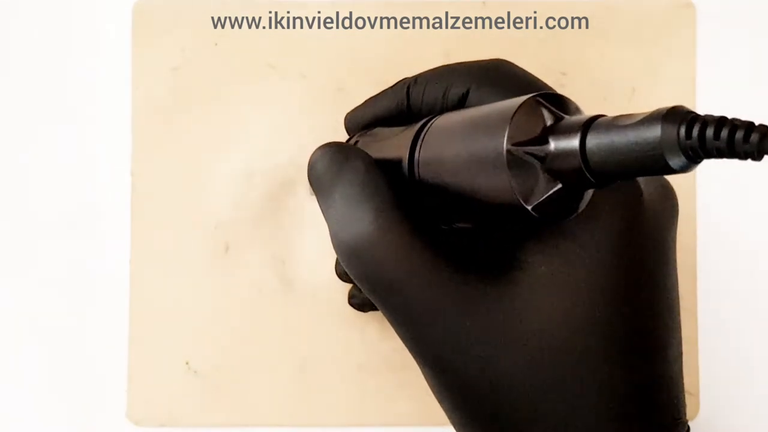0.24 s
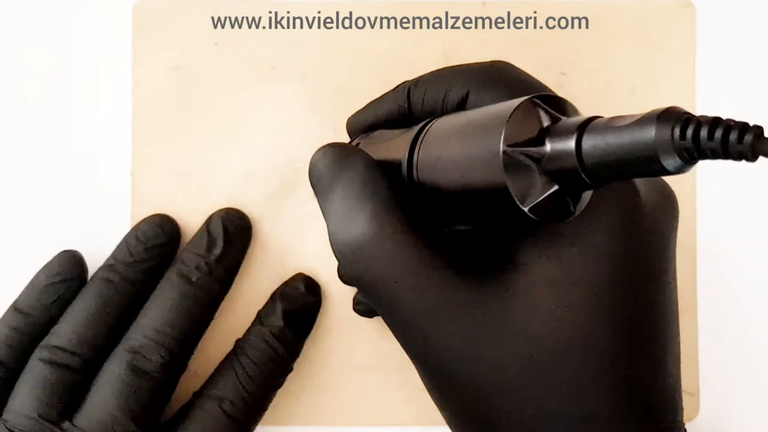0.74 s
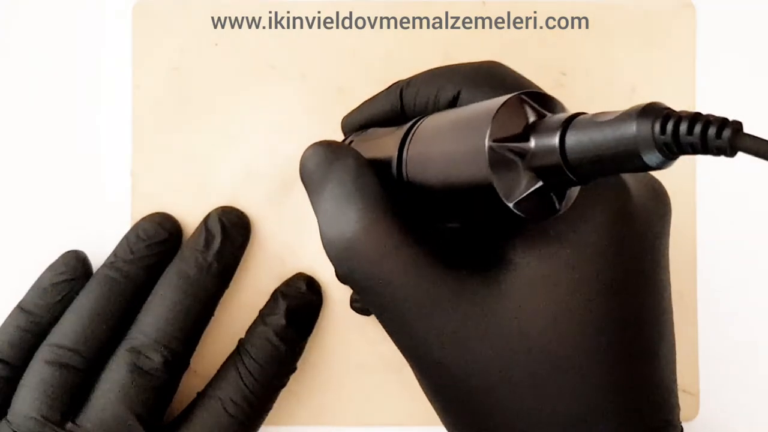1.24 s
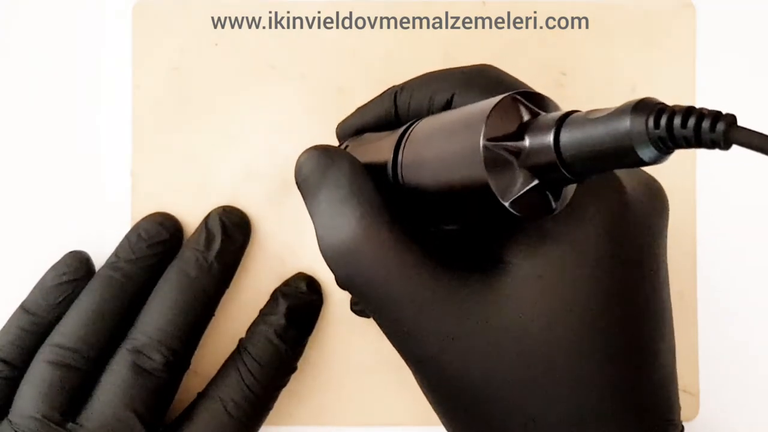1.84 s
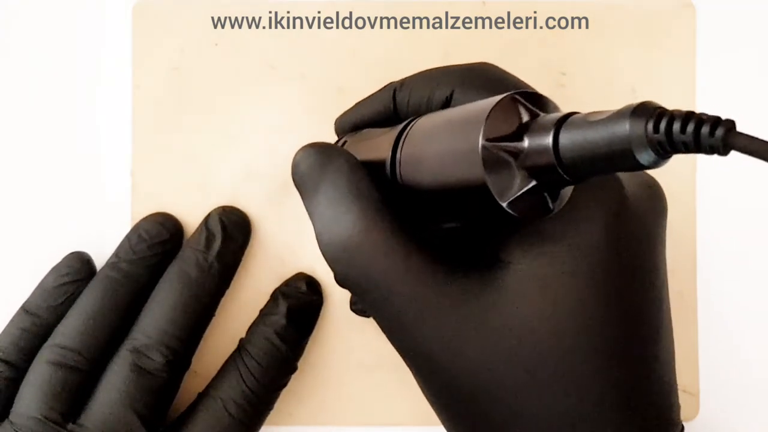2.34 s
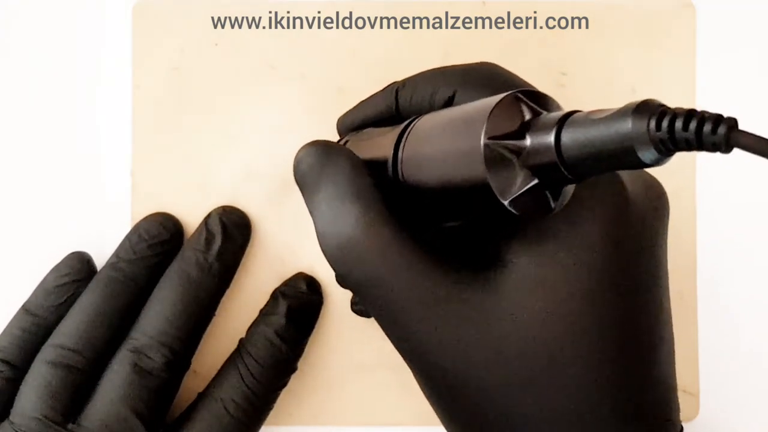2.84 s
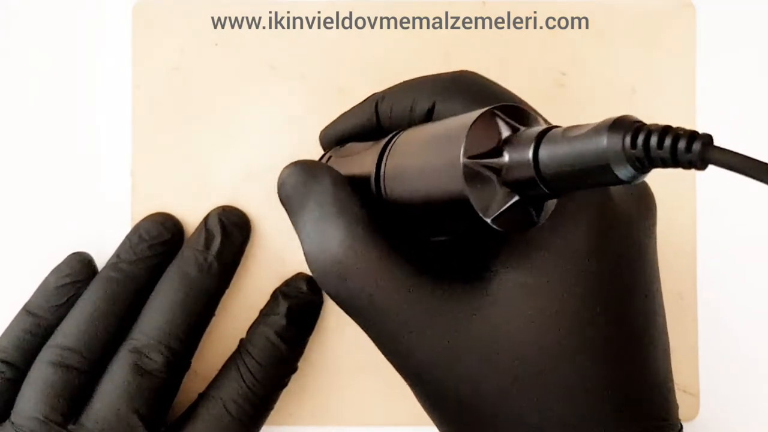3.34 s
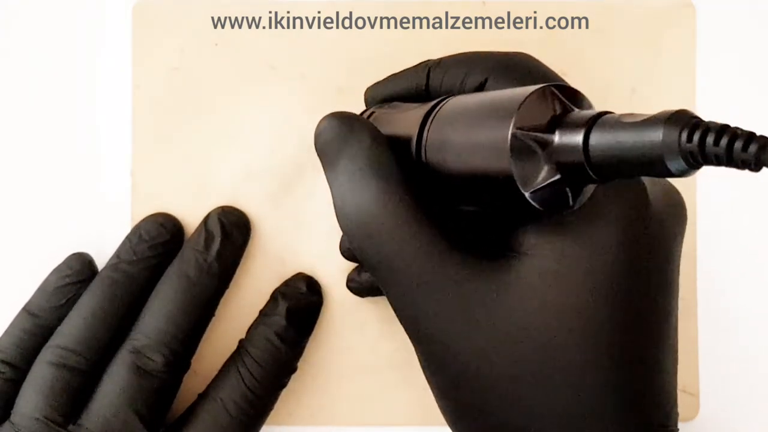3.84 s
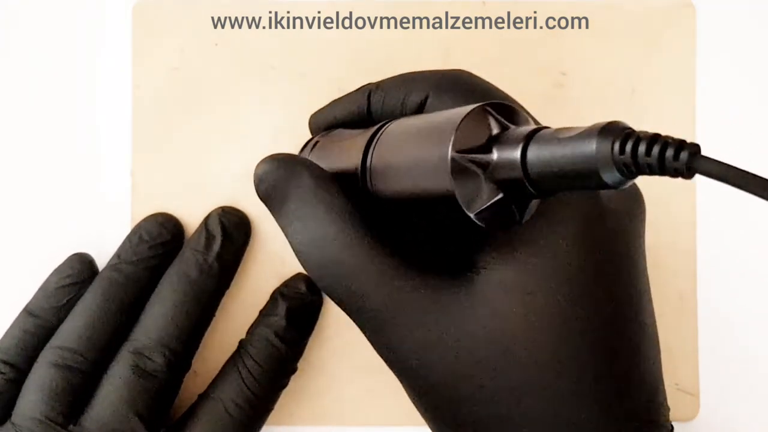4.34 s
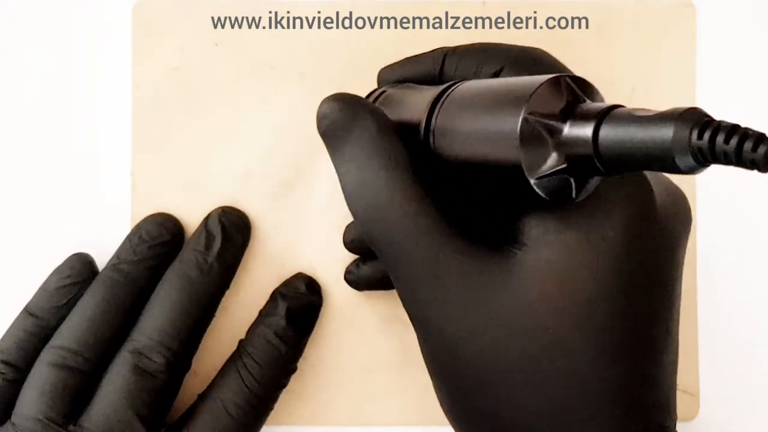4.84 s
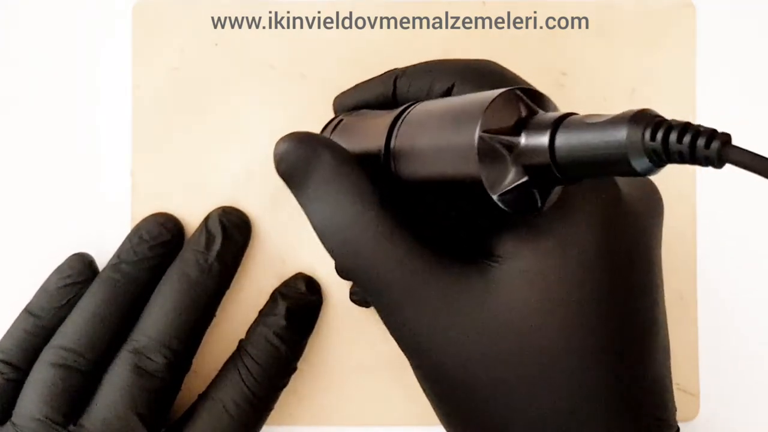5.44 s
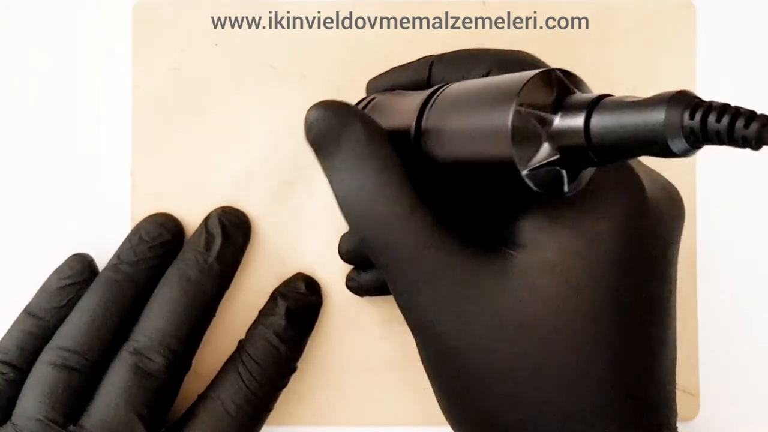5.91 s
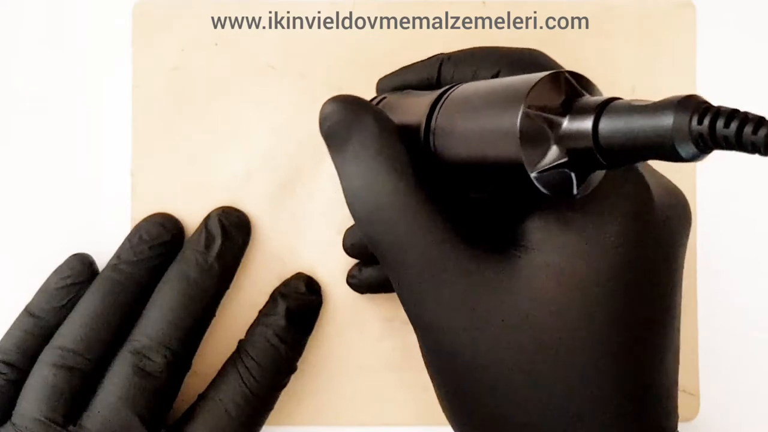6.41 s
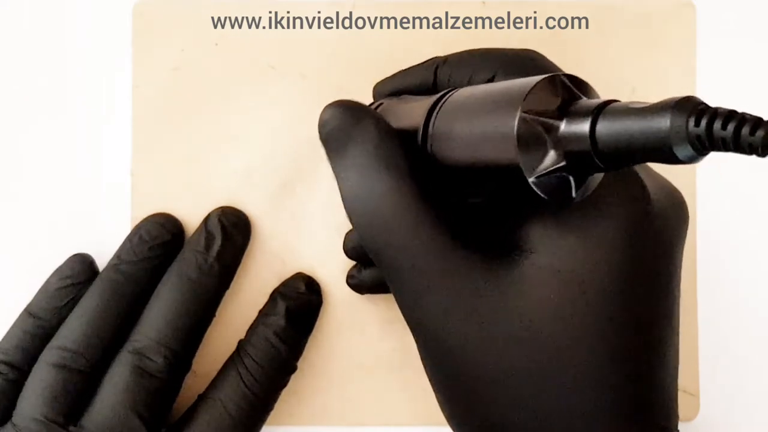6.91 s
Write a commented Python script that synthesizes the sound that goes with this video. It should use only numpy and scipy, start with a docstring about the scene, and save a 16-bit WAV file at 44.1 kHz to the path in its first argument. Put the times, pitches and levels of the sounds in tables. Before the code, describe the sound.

Close stereo pickup of a handheld tattoo machine working on rubber practice skin. A rough, noisy onset settles into a continuous low drumming drone, overlaid by a mid-range buzz, metallic chatter and thin treble rasp. Pitch sags and recovers slightly as the hand presses, with a few tiny dull snags buried inside. It cuts off quickly near the end, leaving quiet hiss and rumble in a dry small room.

```python
"""Hiss and rumble, a faint grazing buzz, then the steady drumming buzz of a rotary tattoo pen.
It draws on a rubber practice skin that lies on a table in a small room.
Once per motor turn the cam knocks, the needle thumps the skin (summed partials) and rasps back (noise bursts).
Hand pressure slows the motor and sets the level of every part.
The needle lands, works back and forth and lifts off, leaving hiss and rumble."""
import sys
import numpy as np
from scipy import signal
from scipy.fft import rfft, irfft, next_fast_len
from scipy.io import wavfile
from scipy.ndimage import uniform_filter1d

SR = 44100
rng = np.random.default_rng(int(sys.argv[2]) if len(sys.argv) > 2 else 0)


def unload_audio(sound):
    """Save the sound as a 16-bit wav file, at the path given as the first command line argument."""
    columns = np.transpose(np.atleast_2d(sound))
    # keep every value between -1 and 1, then stretch to whole-number steps
    steps = np.round(np.clip(columns, -1, 1) * 32767)
    wavfile.write(sys.argv[1], SR, steps.astype(np.int16))


N = 316194


def from_db(db):
    """Decibels to gain."""
    return 10 ** (np.asarray(db) / 20)


def rms_one(x):
    """Scale to rms 1."""
    return x / np.sqrt(np.mean(x ** 2) + 1e-20)


def evened(x, size=2600):
    """Hold the running rms at 1, so that partials trade strength at a constant level."""
    return x / np.sqrt(uniform_filter1d(np.mean(x ** 2, 0), size=size) + 1e-12)


def in_time(rows):
    """Each column of a curve, sample by sample."""
    s, *columns = np.transpose(rows)
    return [np.interp(np.arange(N) / SR, s, c) for c in columns]


def at_hz(points, hz):
    """Read a spectrum on a log-frequency axis."""
    point_hz, value = np.transpose(points)
    return np.interp(np.log(hz), np.log(point_hz), value)


def drift(rate_hz):
    """Slow random wander of spread 1: two-pole lowpassed noise, computed at SR / 40."""
    step = 40
    r = np.exp(-2 * np.pi * rate_hz * step / SR)
    noise = rng.standard_normal(N // step + 2002)
    slow = rms_one(signal.lfilter([1], [1, -2 * r, r * r], noise)[2000:])
    return np.interp(np.arange(N) / step, np.arange(len(slow)), slow)


def pan(lean_db):
    """Left and right gains for a level difference."""
    return from_db(np.array([[.5], [-.5]]) * lean_db)


def mid_side(mid, side, alike):
    """Two channels with correlation `alike` from two independent signals."""
    return rms_one(np.sqrt(1 + alike) * mid + np.sqrt(1 - alike) * side * [[1], [-1]])


def stereo_noise(alike):
    """White noise in two correlated channels."""
    mid, side = rng.standard_normal((2, N))
    return mid_side(mid, side, alike)


# pen's stereo position, left minus right: f/Hz, level/dB
PEN_LEAN = [(105, 3.4), (210, 3.6), (315, 1.5), (420, 2.1), (630, -1.5), (735, 6), (840, -3), (1300, 1.5),
            (2400, 1.8), (4400, 4), (6000, 5.2), (7600, 0), (10500, .6), (15000, -1)]


def colour(x, spectrum, lean=0):
    """Minimum-phase filter with steep skirts, output rms 1; `lean` is the share of the pen's stereo position."""
    size = next_fast_len(N + SR // 10) * 2
    hz = np.maximum(np.fft.rfftfreq(size, 1 / SR), 1)
    octaves_outside = np.abs(np.log2(hz / np.clip(hz, spectrum[0][0], spectrum[-1][0])))
    level_db = np.maximum(at_hz(spectrum, hz) - 60 * octaves_outside, -80)
    cepstrum = irfft(np.log(from_db(level_db)))
    response = np.exp(rfft(2 * cepstrum[:size // 2], size) - cepstrum[0])
    placed = rfft(x, size) * response * pan(lean * at_hz(PEN_LEAN, hz))
    return rms_one(irfft(placed)[:, :N])


def resonate(x, hz, width_hz):
    """Two-pole resonance, gain 1 on top."""
    r = np.exp(-np.pi * width_hz / SR)
    zeros = np.array([1, 0, -1]) * (1 - r * r) / 2
    poles = [1, -2 * r * np.cos(2 * np.pi * hz / SR), r * r]
    return signal.lfilter(zeros, poles, x)


def contacts(turns, when, jitter_s, uneven_db):
    """One click per turn, `when` turns in, with random spread in time and strength."""
    count = np.arange(1, int(turns[-1]) - 1)
    chance = np.sqrt(3) * rng.uniform(-1, 1, (1000, 2))[:len(count)]   # spread 1
    at = np.interp(count + when, turns, np.arange(N)) + chance[:, 0] * jitter_s * SR
    at = np.clip(at, 0, N - 2)
    whole, fraction = at.astype(int), at % 1
    clicks, size = np.zeros(N), from_db(uneven_db * chance[:, 1])
    clicks[whole] = size * (1 - fraction)
    clicks[whole + 1] += size * fraction
    return clicks


def die_away(clicks, decay_s):
    """Each click starts an exponential envelope."""
    return signal.lfilter([1], [1, -np.exp(-1 / (decay_s * SR))], clicks)


def repeating(turns, memory, alike):
    """Friction over the same roughness: noise locked to the turn, keeping share `memory` each turn."""
    size, oversample = 420, 4   # noise points per turn
    fresh = rng.standard_normal((2, 900, size))
    worn = signal.lfilter([1], [1, -memory], fresh, axis=1)[:, 100:].reshape(2, -1)
    fine = signal.resample_poly(worn, oversample, 1, axis=1)
    mid, side = [np.interp(turns * size * oversample, np.arange(len(w)), w) for w in fine]
    return mid_side(mid, side, alike)


def scratches(turns, when, decay_s, uneven_db, steady, memory, alike):
    """Once per turn a dying burst of friction, over steady rubbing."""
    clicks = contacts(turns, when=when, jitter_s=.00008, uneven_db=uneven_db)
    return rms_one((die_away(clicks, decay_s) + steady) * repeating(turns, memory, alike))


def hand_echo(x, delay_s, share=.33):
    """Close reflection off the hand; its delay drifts as the hand moves, shifting the colour."""
    now = np.arange(N)
    then = now - delay_s * SR * np.exp(0.14 * drift(0.9))
    echo = np.array([np.interp(then, now, side) for side in x])
    return rms_one(x + share * echo)


# motor speed, sagging under the hand: t/s, f/Hz
MOTOR_SPEED = [(0.22, 110.7), (0.34, 107.4), (0.38, 104.6), (0.74, 105.5), (0.79, 106.9), (0.98, 104.9),
               (1.06, 108.2), (1.24, 106.7), (1.35, 110.3), (1.55, 105.9), (1.64, 110.3), (1.7, 109.7),
               (1.75, 106.0), (1.87, 105.7), (1.96, 110.5), (2.02, 106.0), (2.22, 108.8), (2.26, 111.2),
               (2.31, 106.8), (2.4, 104.6), (2.47, 106.8), (2.56, 104.3), (3.05, 103.4), (3.22, 106.2),
               (3.33, 106.4), (3.47, 103.6), (3.68, 104.4), (3.78, 107.1), (4.02, 102.2), (4.28, 104.1),
               (4.37, 106.7), (4.5, 103.6), (4.72, 104.3), (4.81, 107.1), (4.93, 107.4), (5.05, 104.7),
               (5.27, 108.4), (5.42, 104.1), (5.73, 106.4), (5.87, 103.3), (5.97, 104.5), (6.03, 106.8),
               (6.22, 103.4), (6.42, 106.2)]


def motor():
    """Motor speed in Hz, and its angle in turns with a slight fast flutter."""
    speed_hz, = in_time(MOTOR_SPEED)
    return speed_hz, np.cumsum(speed_hz * (1 + 0.001 * drift(28))) / SR


# pressure laws: pressure/0-1, then relative level/dB of thump, knock, cam buzz, rattle, rasp; noisy share of buzz/0-1
PRESSURE_LAWS = [(0, -38.5, -51, -8, -49, -58, 0.45), (.3, -32, -47, -1, -45.6, -51.5, 0.15),
                 (.65, -27, -43.5, .5, -43.5, -48, 0.15), (1, -24.3, -37, -1, -42, -45, 0.27)]


def pressure_laws(speed_hz):
    """The motor's sag tells the pressure; each part's setting follows from it."""
    light_hz, sag_hz = 111.3, 9   # speed at the lightest touch, fall at full pressure
    steps, *columns = np.transpose(PRESSURE_LAWS)
    return [np.interp((light_hz - speed_hz) / sag_hz, steps, c) for c in columns]


def partial_lean(order):
    """Stereo gains of a partial at the mean motor speed."""
    return pan(at_hz(PEN_LEAN, order * np.mean(np.array(MOTOR_SPEED)[:, 1])))


# drumming partials: multiple of motor speed, relative level/dB
DRUM_PARTIALS = [(1, 2), (2, 1.66), (3, 5.1), (4, -7), (5, -21.5), (6, -17), (7, -19), (8, -19.5), (9, -40)]


def thump(turns, thump_db, waver_db=0.92):
    """The needle's push gives four strong partials; the third and fourth waver most."""
    left_lead_turns, bass_lag_turns = .014, .11
    turns = turns + np.array([[left_lead_turns], [0]])
    out = np.zeros((2, N))
    for order, (_, level_db) in enumerate(DRUM_PARTIALS[:4], 1):
        gain = from_db(level_db + (order - 1.5) * waver_db * drift(7.0))
        late = bass_lag_turns * (order == 1)   # heavy table top follows the lowest partial late
        out -= partial_lean(order) * gain * np.cos(2 * np.pi * order * (turns - late))
    return from_db(thump_db + 0.13) * evened(out)


def knock(turns, knock_db, lead_turns=0.1624, waver_db=2.5, path_shift_rad=1.0):
    """The table's knock, just ahead of the thump: the next five partials, phases shifting with the hand."""
    out = np.zeros((2, N))
    for order, (_, level_db) in enumerate(DRUM_PARTIALS[4:], 5):
        path = path_shift_rad * drift(2) + np.array([.4 + .5 * drift(2), -.4 + .5 * drift(2)])
        gain = from_db(level_db + waver_db * drift(9.1))
        out += partial_lean(order) * gain * np.cos(2 * np.pi * order * (turns + lead_turns) + path)
    return from_db(knock_db - 1.25) * evened(out)


def skin_rub(turns, thump_db):
    """Dull scuffing of the needle in the rubber, growing with the pressure."""
    scuff = scratches(turns, when=-.2, decay_s=.003, uneven_db=3., steady=.4, memory=.15, alike=.8)
    dull = [(60, -18), (270, 4.5), (400, -2), (560, -12.0), (1000, -12.5), (1800, -19)]   # f/Hz, dB
    return from_db(thump_db - 20.5) * colour(scuff, dull, lean=1)


# needle snags: t/s, relative level/dB
NEEDLE_SNAGS = [(0.9114, -37), (1.8234, -43), (2.6457, -36), (2.6552, -34.5)]


def snags(decay_s=0.0025):
    """Brief dull cracks where the needle catches in the rubber: decaying band-passed noise."""
    clicks = np.zeros(N)
    for s, db in NEEDLE_SNAGS:
        clicks[round(s * SR)] = from_db(db)
    crack = die_away(clicks + 1e-18, decay_s) * stereo_noise(.4)
    band = signal.butter(2, [700, 3700], "band", fs=SR, output="sos")
    return from_db(14.0) * signal.sosfilt(band, crack)


# housing response: f/Hz, level/dB
HOUSING_RESPONSE = [(950, -1.5), (1040, 2), (1150, -5.5), (1260, 1), (1370, 0), (1580, 2), (1700, -10),
                    (1800, -27)]
# housing ring, shifting with the grip: t/s, f/Hz
GRIP_RING = [(0.2, 1350), (0.28, 1475), (1.74, 1434), (1.77, 1340), (2.28, 1450), (2.35, 1310),
             (2.66, 1440), (2.87, 1280), (3.37, 1460), (3.82, 1350), (3.91, 1395), (4.03, 1290),
             (4.6, 1490), (4.81, 1310), (4.86, 1480), (5.55, 1494), (5.62, 1400), (6.42, 1440)]
# housing whine: t/s, relative level/dB
WHINE_LEVEL = [(0.24, -37), (0.3, -35), (0.53, -46.5), (0.6, -38), (0.74, -44.5), (2.171, -42.5),
               (2.99, -48.5), (3.08, -41.5), (3.34, -43.5), (3.4, -40), (4.24, -44), (4.34, -46.5),
               (4.67, -40.5), (4.79, -44), (5.06, -39), (5.12, -47), (5.45, -40.7), (5.73, -43.5),
               (5.83, -37), (6.0, -43), (6.31, -41), (6.38, -45.6)]


def cam(turns, speed_hz, buzz_db, noisy, lead_turns=0.3255, grip_width_hz=110, grip_db=9, waver_db=1.5,
        path_shift_rad=0.44):
    """The cam's blow drives the housing, which favours partials near its shifting ring."""
    (grip_hz,), (whine_db,) = in_time(GRIP_RING), in_time(WHINE_LEVEL)
    lines, power = np.zeros((2, N)), 0
    for order in range(9, 18):
        hz = order * speed_hz
        favour_db = grip_db / (1 + ((hz - grip_hz) / grip_width_hz) ** 2)
        gain = from_db(at_hz(HOUSING_RESPONSE, hz) + favour_db + waver_db * drift(6.1))
        path = path_shift_rad * drift(1) + .35 * np.array([drift(1.5), drift(1.5)])
        lines += gain * np.cos(2 * np.pi * order * (turns + lead_turns) + path)
        power = power + gain ** 2 / 2
    lines /= np.sqrt(uniform_filter1d(power, size=2200))
    skips = scratches(turns, when=-.45, decay_s=0.0015, uneven_db=-1.0, steady=0.34, memory=0.29, alike=1.0)
    skips = colour(skips, [(950, -11.0), (1200, -15), (1350, 1.0), (1560, -2), (1730, -14), (2300, -8),
                           (2900, -29)])
    buzz = np.sqrt(1 - noisy ** 2) * lines + noisy * skips
    return from_db(buzz_db + whine_db + 0.64) * buzz * pan(1.6)


# rattle spectrum: f/Hz, level/dB per Hz
RATTLE_COLOUR = [(1000, 1), (1750, -0.5), (1950, -0.5), (2200, 3), (2550, 3), (2900, -1), (3330, 5),
                 (3750, -3.5), (4400, -4)]
# rattle's ringing spectrum: f/Hz, level/dB per Hz
RING_COLOUR = [(4200, -16.5), (4600, -6.5), (4980, 0.5), (5360, -1.5), (5900, 3.5), (6450, 0), (6950, -3),
               (7500, -0.5), (7800, -12), (8100, -37)]
# rasp spectrum: f/Hz, level/dB per Hz
RASP_COLOUR = [(8200, -21), (9000, -5.5), (9900, -4.5), (10650, 1.5), (11350, -2), (12100, 1), (12900, 0),
               (13700, 1.5), (14500, -3.5), (15700, -11)]
# top treble about the pressure's value: t/s, level/dB
TREBLE_SWING = [(0.38, -1.5), (1.41, -3), (2.17, 0.5), (2.47, -2.7), (2.9, 1), (3.45, -6), (3.87, 1.5),
                (4.66, -6), (4.88, 3), (5.37, -4.5), (5.69, 2.5), (6.0, -6), (6.12, 0.5), (6.38, -4.5)]


def cartridge(turns, rattle_db, rasp_db, rattle_treble_share=0.22):
    """The needle bar chatters in its tube, and rasps as it is pulled out of the skin."""
    treble_db, = in_time(TREBLE_SWING)
    chatter = scratches(turns, when=0.082, decay_s=0.0032, uneven_db=1.5, steady=0.49, memory=0.67, alike=0.078)
    chatter = chatter + 0.34 * rms_one(contacts(turns, when=-.42, jitter_s=.00002, uneven_db=9.0))
    ring = scratches(turns, when=0.039, decay_s=0.0032, uneven_db=1.5, steady=0.17, memory=0.57, alike=0.13)
    rasp = scratches(turns, when=0.051, decay_s=0.0035, uneven_db=1.5, steady=0.13, memory=0.69, alike=0.067)
    chatter = from_db(-0.5) * colour(hand_echo(chatter, delay_s=0.001245), RATTLE_COLOUR, lean=0.42)
    ring = from_db(-0.6) * colour(hand_echo(ring, delay_s=0.000817), RING_COLOUR, lean=1)
    rasp = from_db(5.5) * colour(hand_echo(rasp, delay_s=0.000501), RASP_COLOUR, lean=0.67)
    rattle_gain = from_db(rattle_db + rattle_treble_share * treble_db)
    return rattle_gain * (chatter + ring) + from_db(rasp_db + treble_db) * rasp


LAND_S, LIFT_S = 0.18, 6.405   # needle meets and leaves the skin


def on_skin(attack_s, release_s):
    """Rise after the landing, hold, and die away after the lift."""
    t = np.arange(N) / SR
    return np.clip((t - LAND_S) / attack_s, 0, 1) * np.exp(-np.maximum(t - LIFT_S, 0) / release_s)


def skitter(fade_s=0.39, share=0.52):
    """Extra noisy share of the buzz as the needle skitters on landing."""
    t = np.arange(N) / SR
    return share * np.exp(-(np.maximum(t - LAND_S, 0) / fade_s) ** 4)


def graze(at_s=0.064, width_s=.035, level_db=-13.5):
    """Bell-shaped gain for a faint buzz just before the landing."""
    t = np.arange(N) / SR
    return from_db(level_db) * np.exp(-((t - at_s) / width_s) ** 2)


def to_microphones(x, right_lag_s=.000136):
    """The pen is a little nearer to the left microphone."""
    now = np.arange(N)
    return np.array([x[0], np.interp(now - right_lag_s * SR, now, x[1])])


def room(x, t60_s=.28, mode_hz=213, mode_width_hz=7, wall_cut_hz=3500):
    """A small furnished room: one low mode and a faint diffuse tail above it."""
    t = np.arange(SR // 2) / SR
    tail = rng.standard_normal((2, len(t))) * from_db(-60 * t / t60_s) * (t > .006)
    tail /= np.sqrt(np.sum(tail ** 2, 1, keepdims=True))
    walls = signal.butter(2, [800, wall_cut_hz], "band", fs=SR, output="sos")
    diffuse = signal.sosfilt(walls, signal.fftconvolve(x, tail, axes=1)[:, :N])
    boom = from_db(-12) * resonate(x, mode_hz, mode_width_hz)
    return from_db(-4.5) * diffuse + boom


# hiss spectrum: f/Hz, level/dB per Hz
HISS_COLOUR = [(410, -25), (700, -12.5), (1470, -9.5), (2090, -11.5), (3460, -1.5), (3740, -8.5),
               (4610, -6.5), (6130, 2), (7260, -6.5), (7850, -8.5), (9290, -19), (10300, -3), (11400, -15),
               (13400, -7.5), (15600, -22)]
# rumble spectrum: f/Hz, level/dB per Hz
RUMBLE_COLOUR = [(22, -19), (31, -11), (39, 0), (49, -4.5), (65, -6), (85, -5.5), (112, -3), (160, -9),
                 (300, -13), (420, -24), (700, -35)]
# rumble: t/s, level/dB
RUMBLE_LEVEL = [(0, -46.5), (0.2, -52), (2, -48.5), (4, -50), (6.3, -48), (6.65, -55), (6.9, -53),
                (7.15, -53.5)]


def background(hiss_db=-51, hiss_lean_db=2.0):
    """Microphone hiss and the low rumble of the room: coloured noise."""
    rumble_db, = in_time(RUMBLE_LEVEL)
    hiss = from_db(hiss_db) * colour(stereo_noise(0.1), HISS_COLOUR) * pan(hiss_lean_db)
    return hiss + from_db(rumble_db) * colour(stereo_noise(0.86), RUMBLE_COLOUR)


# table's answer where the needle is: t/s, level/dB
TABLE_SWING = [(0.38, 5.5), (0.51, 1.6), (1.34, 0.3), (2.62, 1.8), (3.77, -1.9), (3.95, 0.6), (4.01, -1.3),
               (5.12, -0.9), (5.2, -3.1), (5.47, 0.6), (5.9, 0.8), (6.04, -1.4), (6.11, 2.0), (6.38, -0.8)]


def scene():
    """One motor angle drives every part of the pen, and one pressure sets their levels."""
    speed_hz, turns = motor()
    thump_db, knock_db, buzz_db, rattle_db, rasp_db, noisy = pressure_laws(speed_hz)
    answer_db, = in_time(TABLE_SWING)
    thump_db = thump_db + answer_db
    table = thump(turns, thump_db) + skin_rub(turns, thump_db) + knock(turns, knock_db + answer_db) + snags()
    buzz = cam(turns, speed_hz, buzz_db, np.clip(noisy + skitter(), 0, 1))
    needle = cartridge(turns, rattle_db + .4 * answer_db, rasp_db)
    # the cam rises fastest; needle and table join as the needle sinks in
    pen = (on_skin(attack_s=0.05, release_s=.026) + graze()) * buzz
    pen = pen + on_skin(attack_s=0.14, release_s=.026) * needle
    direct = to_microphones(pen) + on_skin(attack_s=0.23, release_s=.027) * table
    return direct + room(direct) + background()


def record(dry, cutoff_hz=15800):
    """The top is cut steeply."""
    return signal.sosfilt(signal.ellip(12, .1, 80, cutoff_hz, fs=SR, output="sos"), dry)


dry = scene()
out = record(dry)
unload_audio(out)
```